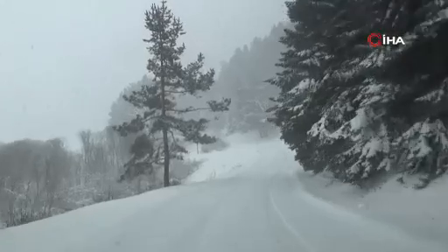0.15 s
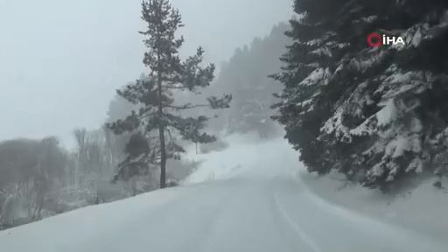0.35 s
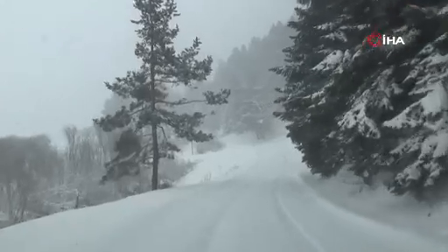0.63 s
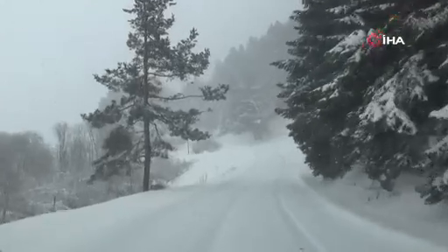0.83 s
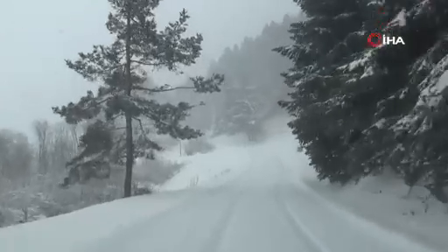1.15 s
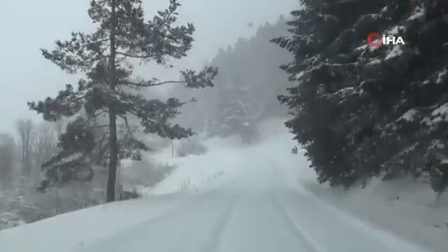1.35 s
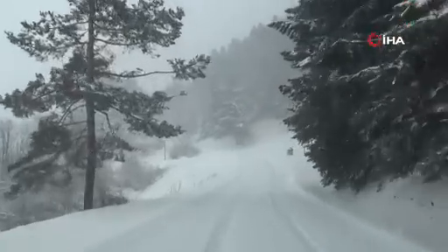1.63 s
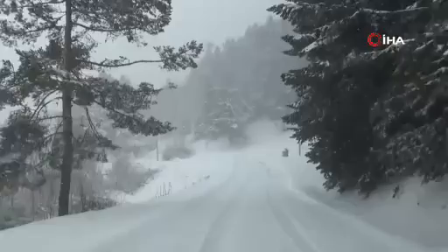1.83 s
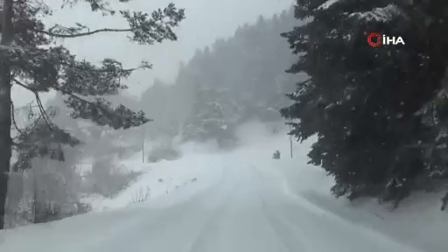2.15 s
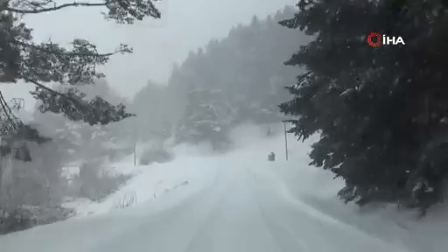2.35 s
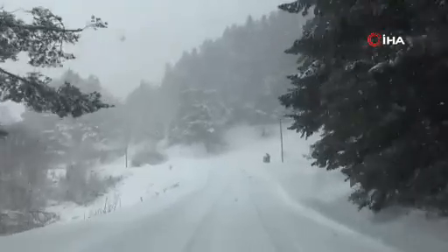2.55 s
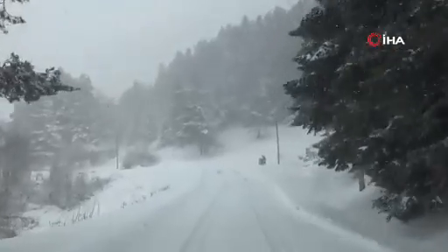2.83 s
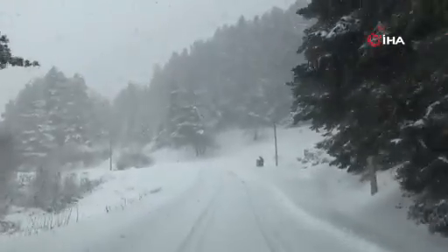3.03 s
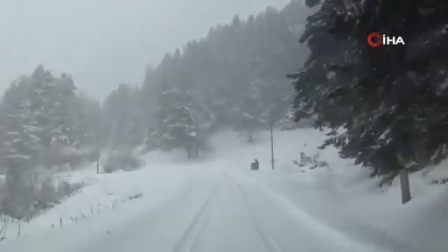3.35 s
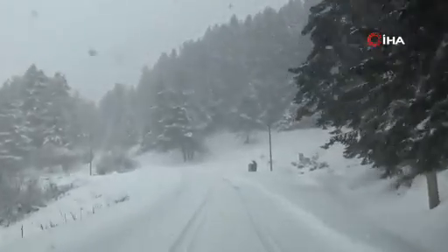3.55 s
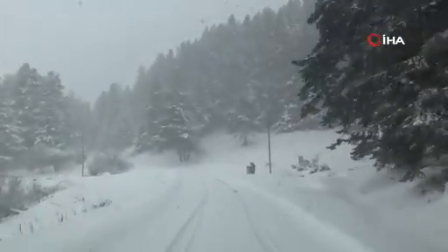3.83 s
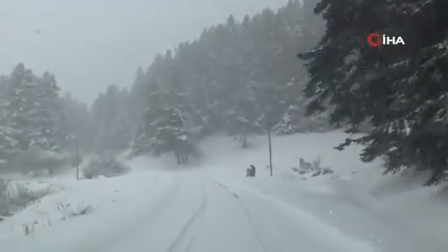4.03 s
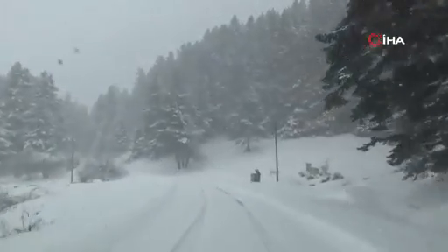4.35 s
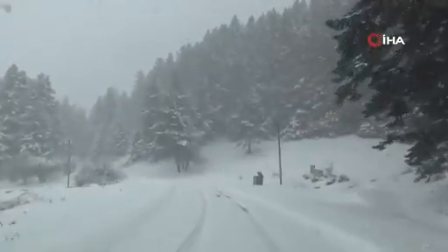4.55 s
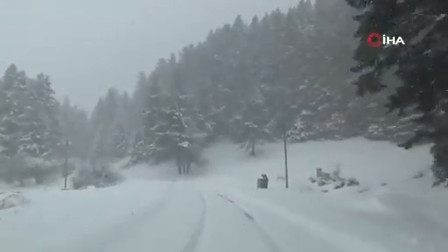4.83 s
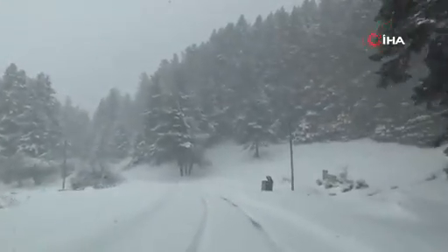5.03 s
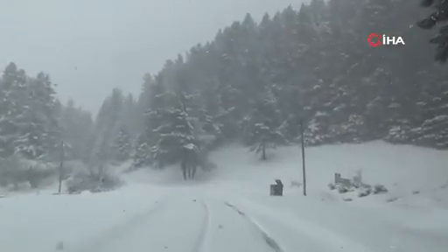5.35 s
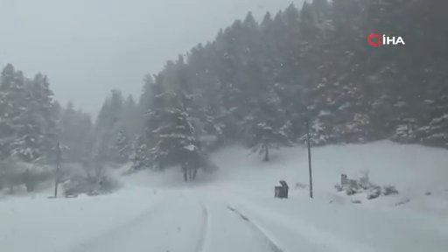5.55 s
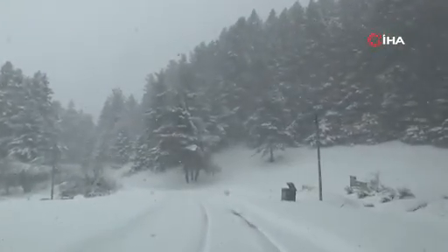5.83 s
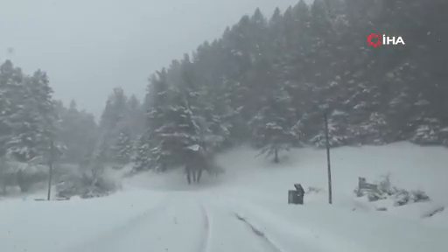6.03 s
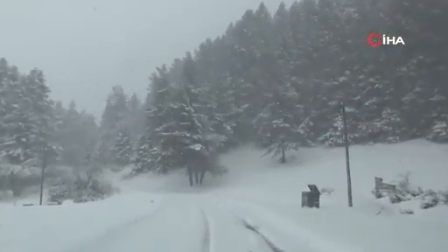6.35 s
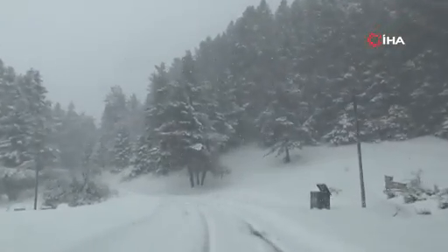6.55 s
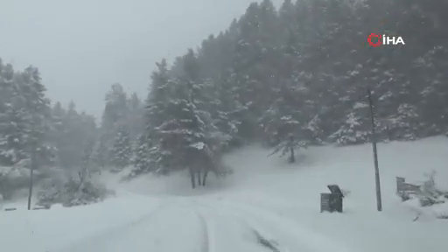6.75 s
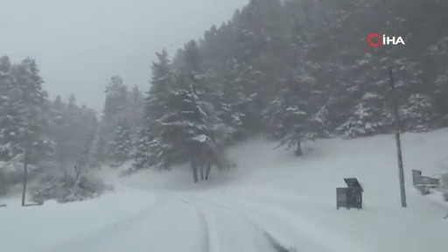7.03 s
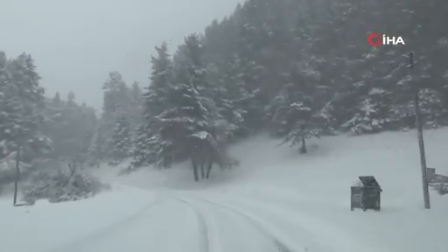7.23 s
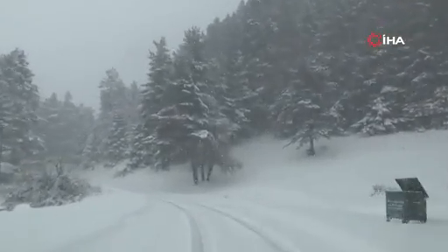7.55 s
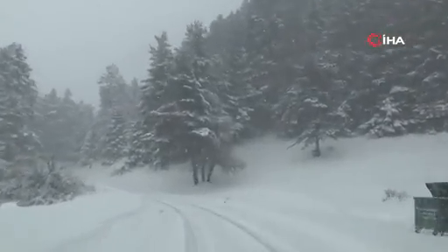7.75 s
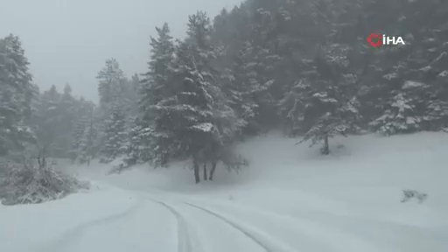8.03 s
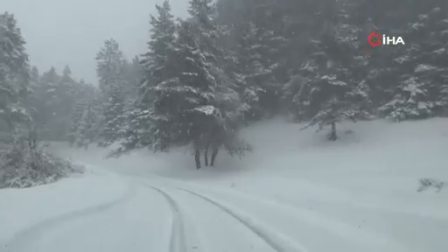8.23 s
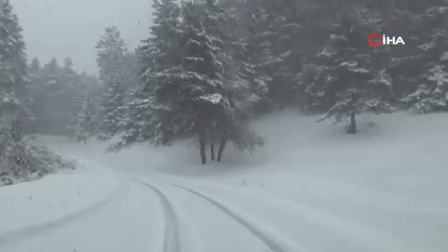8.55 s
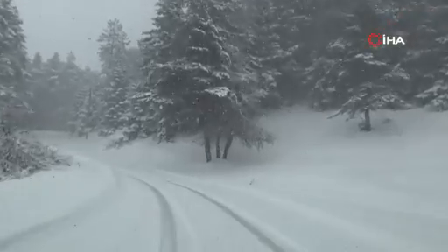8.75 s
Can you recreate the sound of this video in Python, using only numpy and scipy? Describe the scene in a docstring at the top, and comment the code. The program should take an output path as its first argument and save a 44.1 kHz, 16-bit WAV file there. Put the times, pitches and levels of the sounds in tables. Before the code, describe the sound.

A deep road rumble fills the cabin of a moving car, swelling over humps, with the engine droning faintly beneath. The microphone inside picks up small plastic ticks, short creaks and light metallic clinks over the quiet crunch of snow under the tyres. Later a faint tyre whine rises and falls amid a soft hum, and ruts thud under the floor toward the end.

```python
"""Driving on snow

Inside a car rolling steadily along a snowy road. The road shakes the body into a deep rumble over a
faint engine drone, and humps make it boom. The tyres crunch, throw snow at the wheel arches and later
hum and whine. Plastic trim ticks, something like keys clinks, panels creak and ruts thud underneath."""
import sys
import numpy as np
from scipy import signal
from scipy.fft import rfft, irfft
from scipy.io import wavfile
from scipy.ndimage import uniform_filter1d, minimum_filter1d

SR = 44100
rng = np.random.default_rng(int(sys.argv[2]) if len(sys.argv) > 2 else 0)


def unload_wav(signal):
    """Save mono or channel-first audio to the path in sys.argv[1] as 16-bit WAV at rate SR, clipped to [-1, 1]."""
    wavfile.write(
        sys.argv[1],
        SR,
        np.round(np.clip(np.atleast_2d(signal).T, -1, 1) * 32767).astype(np.int16),
    )


N = 392490
TIME = np.arange(N) / SR
FREQS = np.fft.rfftfreq(N, 1 / SR)


def gain_of(db):
    """Turns decibels into a number to multiply by."""
    return 10 ** (np.asarray(db) / 20)


def unit_rms(x):
    """Scales a signal so that its average size (rms) is 1."""
    return x / np.sqrt(np.mean(x ** 2) + 1e-20)


def across(points):
    """Reads a table of (frequency, value) at every frequency."""
    hz, value = np.transpose(points)
    return np.interp(np.log(FREQS + 1), np.log(hz + 1), value)


def along(rows):
    """Reads a table of (time, values...) at every sample."""
    s, *columns = np.transpose(rows)
    return [np.interp(TIME, s, c) for c in columns]


def add(mix, s, sound):
    """Lays a stereo sound into the mix, starting at s seconds."""
    part = mix[:, round(s * SR):][:, :sound.shape[1]]
    part += sound[:, :part.shape[1]]


def noise():
    """Two unrelated white noises."""
    return rng.standard_normal((2, N))


def wander(rate_hz):
    """A smooth random wobble of rms 1, no faster than about rate_hz."""
    return unit_rms(irfft(rfft(rng.standard_normal(N)) / (1 + (FREQS / rate_hz) ** 4), N))


def fade(t, t60):
    """Dies away by 60 dB in t60 seconds, the fade time."""
    return gain_of(-60 * t / t60)


def swell(s, length_s, db):
    """Power that rises to db at time s and falls again, staying above half for length_s."""
    distance = 2 * np.arcsinh(1) * (TIME - s) / length_s
    return gain_of(db) ** 2 / np.cosh(np.clip(distance, -20, 20)) ** 2


def steadied(x, span_s):
    """Evens out the slow chance swells of a noise."""
    power = uniform_filter1d((x ** 2).mean(0), int(span_s * SR), mode="reflect")
    return x / np.sqrt(np.abs(power) + 1e-9)


def causal(gain):
    """Makes a filter act like a real object, which rings only after it is struck."""
    log_gain = np.log(np.r_[gain, gain[-2:0:-1]])
    return np.exp(np.conj(signal.hilbert(log_gain)))[:len(gain)]


# how much louder the left side is than the right: f/Hz, level/dB
BALANCE = [(60, 0), (150, 1.5), (300, -3), (700, -1.1), (1400, -1.5), (4000, 0.3)]
# sound the two sides do not share, against what they share: f/Hz, level/dB
WIDTH = [(30, -21), (60, -20.5), (150, -9.5), (300, -5), (600, -7.5), (1300, -5), (5000, -6.5),
         (9000, -10.5), (11000, -25)]
def cabin(pair, spectrum):
    """Gives two signals a tone colour and mixes them to stereo; deep sound reaches both sides alike."""
    shared, unshared = rfft(pair)
    width, lean = gain_of(across(WIDTH)), gain_of(across(BALANCE) / 2)
    sides = np.array([(shared + width * unshared) * lean, (shared - width * unshared) / lean])
    colour = causal(unit_rms(gain_of(across(spectrum))))
    return irfft(sides * colour, N)


# how hard the road shakes the car: t/s, rumble level/dB, boom level/dB
SHAKING = [(0, -15.5, -24.5), (.85, -17, -24.5), (1.25, -17.5, -23.5), (1.7, -17.5, -25), (2.35, -15, -25),
           (2.85, -20, -24), (3.1, -13.5, -20.5), (3.85, -16.5, -24.5), (4.1, -14.5, -20.5),
           (4.9, -16.5, -25), (6.1, -14, -20.5), (6.9, -14.5, -20.5), (7.2, -19.5, -25), (7.8, -14, -19.5),
           (8.35, -16, -19.5), (8.9, -16.5, -24)]
# how loudly the tyres roar: t/s, level/dB
ROAR_LEVELS = [(.7, -31), (1.5, -29.5), (2.3, -31.5), (3.1, -31), (4.9, -32), (5.9, -30.5), (8.9, -31.5)]
# tone colours of the body's rumble, the air's boom and the tyres' roar: f/Hz, level/dB
RUMBLE_COLOUR = [(6, -40), (18, -9.5), (29, -4.5), (37, -7.5), (46, 0), (58, 0), (76, -1), (88, -3.5),
                 (100, -3), (118, -12), (170, -35), (400, -80)]
BOOM_COLOUR = [(60, -73), (105, -8.5), (125, -4.5), (147, 0.5), (170, -6), (205, -12.5), (400, -29.5),
               (900, -89)]
ROAR_COLOUR = [(90, -41.5), (190, -6.5), (280, 0), (345, -1), (400, -5.5), (540, -7.5), (615, -7),
               (770, -14.5), (890, -18), (1030, -16), (1400, -26), (2500, -50.5), (8000, -80)]
def road():
    """The uneven road shakes the body, the air in the cabin and the tyres."""
    rumble_db, boom_db = along(SHAKING)
    rumble = gain_of(rumble_db) * steadied(cabin(noise(), RUMBLE_COLOUR), span_s=0.23)
    boom = gain_of(boom_db) * steadied(cabin(noise(), BOOM_COLOUR), span_s=0.233)
    roar = gain_of(along(ROAR_LEVELS)[0]) * cabin(noise(), ROAR_COLOUR)
    return rumble + boom + roar


# the engine's tones: multiple of the firing rate, level/dB
ENGINE_TONES = [(1, -36.5), (2, -30.5), (3, -33.5), (5, -38.5)]
def engine(firing_hz=49.69, waver=0.0067, swell_db=3):
    """Steady firing makes a few low tones, each swelling and fading as the load shifts."""
    turns = np.cumsum(firing_hz * (1 + waver * wander(rate_hz=4.85))) / SR
    out = np.zeros(N)
    for multiple, db in ENGINE_TONES:
        level = gain_of(db + swell_db * wander(rate_hz=0.72))
        out += level * np.sin(2 * np.pi * (multiple * turns + rng.random()))
    return out


def grains(per_s, spread_db, t60):
    """The flickering power of many tiny bursts of random size; it averages 1."""
    loudness = np.minimum(rng.exponential(1, N), 3.2)
    hits = gain_of(spread_db * loudness) * (rng.random(N) < per_s / SR)
    t = np.arange(SR // 8) / SR
    power = signal.oaconvolve(hits ** 2, fade(t, t60) ** 2)[:N]
    return np.abs(power) / np.mean(power)


def crackle(per_s=170, spread_db=4, cycles=3.6, low_hz=1800, high_hz=8500, pitches=20):
    """Bits of snow crust snap under the tyres: tiny ticks at many pitches."""
    t, out = np.arange(SR // 50) / SR, np.zeros((2, N))
    for hz in np.geomspace(low_hz, high_hz, pitches):
        ring = np.cos(2 * np.pi * hz * t) * np.exp(-hz * t / cycles)
        for place, size, side in rng.random((int(per_s * N / SR / pitches), 3)):
            loudness = min(-np.log(1 - size), 3)
            pan = np.sqrt([[side], [1 - side]])
            add(out, place * N / SR, gain_of(spread_db * loudness) * pan * ring)
    return unit_rms(out)


# patches of loose snow: deepest at t/s, length/s, crunch level/dB
LOOSE_SNOW = [(1.4, 0.32, -52.5), (1.81, 0.056, -44.5), (2.033, 0.086, -48.5), (2.206, 0.26, -49),
              (3.656, 0.16, -47.5), (4.008, 0.087, -41), (4.26, 0.064, -44), (4.522, 0.33, -47.5),
              (6.098, 0.09, -48), (6.52, 0.17, -46), (6.897, 0.046, -41), (7.056, 0.038, -46),
              (7.822, 0.11, -46.5), (8.083, 0.06, -45), (8.3, 0.13, -42.5), (8.635, 0.14, -45.5)]
# tone colours of crushed snow and of flying snow: f/Hz, level/dB
CRUNCH_COLOUR = [(400, -40), (1100, -2.5), (1600, 1.5), (2300, 1.5), (2900, -3), (3600, -5), (4400, -7.5),
                 (7000, -25), (14000, -51)]
SPRAY_COLOUR = [(1500, -12.5), (4300, -8), (5100, -2), (5900, -2), (7000, 0), (8800, 0.5), (10000, -4.5),
                (12000, -13.5), (14500, -20.5)]
def snow(crunch_db=-48, spray_db=-52, clump_db=1.96, grain_share=0.29, thin_db=-2.5, thin_until_s=1.1):
    """Tyres crush and fling snow in clumps, more in loose patches: grains patter over a smooth hiss."""
    depth = gain_of(thin_db * np.maximum(1 - TIME / thin_until_s, 0))  # the snow starts thin
    loose = np.sqrt(sum(swell(*patch) for patch in LOOSE_SNOW))
    crunch = np.hypot(depth * gain_of(crunch_db), loose)
    spray = np.hypot(depth * gain_of(spray_db), loose * gain_of(-3))
    clumps = gain_of(clump_db * wander(rate_hz=23.4))
    lumps = grains(per_s=120, spread_db=4.2, t60=0.03)
    out = crunch * gain_of(-8) * crackle()
    for level, colour in (crunch, CRUNCH_COLOUR), (spray, SPRAY_COLOUR):
        # both layers share the big lumps, but each has its own small crystals
        crystals = grains(per_s=190, spread_db=4.6, t60=0.014)
        patter = np.sqrt(1 - grain_share + grain_share * (lumps + crystals) / 2)
        out += level * clumps * cabin(noise() * patter, colour)
    return out


# clear ticks of the plastic trim: t/s, level/dB
TRIM_TICKS = [(0.313, -39), (0.748, -37.5), (1.146, -39), (1.43, -39.5), (1.566, -37.5), (1.624, -25),
              (1.992, -35), (2.311, -32.5), (2.524, -32), (3.389, -38), (3.645, -34.5), (3.953, -31),
              (4.236, -38), (4.271, -35.5), (4.702, -39), (4.819, -38.5), (5.029, -36.5), (5.318, -34),
              (5.352, -38), (5.861, -37.5), (5.929, -31), (6.52, -41), (7.709, -31.5), (7.832, -38.5),
              (7.873, -32.5), (8.678, -35.5), (8.714, -36), (8.725, -36)]
# the notes the plastic rings with: f/Hz, level/dB
PLASTIC_NOTES = [(3620, -21), (5520, -9.5), (7050, -16.5)]
# tone colour of a tick: f/Hz, level/dB
TICK_COLOUR = [(400, -34), (1500, -18), (2900, 0), (3650, 4.5), (4400, -0.5), (5500, 0), (6200, 1.5),
               (7200, 4), (9500, -2.5), (11000, -20), (14500, -17)]
def trim(snap=4.6, rebound_s=0.0026, t60=0.042, detune=0.0264, rattles_per_s=7.4, rattle_db=-48):
    """Plastic trim snaps, bounces once and rings briefly: clear ticks among faint random rattles."""
    gaps, sizes = rng.exponential(1, (120, 2)).T
    times = np.cumsum(gaps) / rattles_per_s
    rattles = [(s, rattle_db + 2 * min(size, 2)) for s, size in zip(times, sizes) if s < N / SR]
    t, out = np.arange(SR // 8) / SR, np.zeros((2, N))
    hz, note_db = np.transpose(PLASTIC_NOTES)[:, :, None]
    hardest_db = max(db for s, db in TRIM_TICKS)
    for s, db in TRIM_TICKS + rattles:
        tick = rng.standard_normal((2, len(t))) * fade(t, t60)
        levels = gain_of(note_db + 2 * rng.standard_normal(hz.shape))
        pitches = hz * (1 + detune * rng.standard_normal(hz.shape))
        ring = (levels * np.sin(2 * np.pi * pitches * t)).sum(0) * fade(t, 1.15 * t60)
        tick[0] += gain_of((db - hardest_db) / 2) * ring  # a light tick hardly rings
        bounce = int(rebound_s * (.5 + rng.random()) * SR)
        tick[0, [0, bounce]] += snap
        add(out, s, gain_of(db) * tick)
    return cabin(out, TICK_COLOUR)


# moments when small metal pieces touch: t/s, level/dB
METAL_TOUCHES = [(0.982, -38), (2.31, -36), (3.291, -40), (3.643, -35), (3.961, -36), (4.064, -43),
                 (4.102, -43), (4.439, -40), (4.507, -37), (4.530, -27), (4.567, -37), (4.732, -32),
                 (5.029, -36), (6.427, -35)]
# the notes the metal rings with: f/Hz, level/dB, fade time/s
METAL_NOTES = [(4830, 1, 0.09), (5940, -3, 0.04), (7790, -2, 0.06), (8980, 1, 0.05), (10300, 4, .06),
               (11300, 2, 0.045)]
def clinks(scatter_db=1.0, detune=0.0044, clash_gain=0.79, clash_t60=0.049, rise_s=0.0017):
    """Small metal pieces touch: a bright clash, and notes that ring a little differently each time."""
    t, out = np.arange(SR // 3) / SR, np.zeros((2, N))
    hz, note_db, t60 = np.transpose(METAL_NOTES)[:, :, None]
    bright = signal.butter(2, [6500, 12000], "band", fs=SR, output="sos")
    octaves_down = np.maximum(np.log2(np.median(hz) / hz), 0)
    hardest_db = max(db for s, db in METAL_TOUCHES)
    for s, db in METAL_TOUCHES:
        size, shift, phase, stereo_gap = rng.standard_normal((4, len(hz), 1))
        lost_db = 3.5 * (hardest_db - db) * octaves_down  # a light touch hardly wakes the low notes
        levels = unit_rms(gain_of(note_db + scatter_db * size - lost_db))
        fading = levels * fade(t, t60) / np.sqrt(len(hz))
        angle = 2 * np.pi * (hz * (1 + detune * shift) * t + phase)
        ring = np.array([(fading * np.sin(angle + side * stereo_gap / 2)).sum(0) for side in (-1, 1)])
        clash = unit_rms(signal.sosfilt(bright, rng.standard_normal(len(t)))) * fade(t, clash_t60)
        add(out, s, gain_of(db) * (ring + clash_gain * clash) * (1 - np.exp(-t / rise_s)))
    return out


# humps in the road: crest at t/s, level/dB, boom f/Hz
ROAD_HUMPS = [(1.58, -14, 58), (1.96, -14.5, 56), (2.33, -18, 48), (2.69, -16, 50), (3.7, -19, 80),
              (4.65, -15, 72), (6.85, -17, 64), (7.66, -15, 60)]
def heaves(length_s=0.099):
    """Each hump heaves the body on its springs, so it booms for a few uneven cycles."""
    wobble, out = wander(rate_hz=14) / 2, np.zeros(N)
    for s, db, hz in ROAD_HUMPS:
        level = np.sqrt(2 * swell(s, length_s, db))
        out += level * np.sin(2 * np.pi * (hz * TIME + rng.random()) + wobble)
    return out


# panels slipping against each other: t/s, level/dB, f/Hz
PANEL_SLIPS = [(1.736, -29.5, 2040), (3.291, -31, 2000), (3.611, -28, 2000), (3.927, -32, 2050),
               (4.202, -30.5, 2420), (6.876, -31, 1960), (6.943, -32, 1960), (8.311, -31, 1750),
               (8.362, -30, 1440), (8.664, -30, 1560), (8.681, -24, 2430)]
def creaks(t60=0.026, rub_share=0.4):
    """A panel slips with a dull tap: a noisy rub and one short note."""
    t, out = np.arange(SR // 8) / SR, np.zeros((2, N))
    dull = signal.butter(2, [1100, 3000], "band", fs=SR, output="sos")
    for s, db, hz in PANEL_SLIPS:
        ring = np.sqrt(2) * np.sin(2 * np.pi * hz * t)
        rub = unit_rms(signal.sosfilt(dull, rng.standard_normal((2, len(t)))))
        creak = np.sqrt(1 - rub_share) * ring + np.sqrt(rub_share) * rub
        add(out, s, gain_of(db) * creak * fade(t, t60))
    return out


# tone colour of brushing powder snow: f/Hz, level/dB
POWDER_COLOUR = [(2500, -26), (4750, -2), (5100, 5), (5450, -4), (6600, 1), (8900, 2), (10500, -2),
                 (14500, -14)]
def swish(peak_s=2.51, length_s=0.17, db=-41):
    """Powder snow brushes along the body once: a bright, gritty hiss with a faint whistle in it."""
    grit = grains(per_s=900, spread_db=3, t60=0.008)
    return np.sqrt(swell(peak_s, length_s, db)) * cabin(noise() * np.sqrt(grit), POWDER_COLOUR)


# ruts and lumps of snow hitting the underside: t/s, level/dB, fade time/s
BLOWS = [(3.957, -23.5, 0.45), (6.908, -25.5, 0.31), (8.266, -24, 0.25), (8.549, -16, 0.13),
         (8.594, -26.5, 0.41), (8.678, -15.5, 0.045)]
# tone colour of the struck underside: f/Hz, level/dB
THUD_COLOUR = [(60, -22), (160, 8), (380, 8.5), (650, 5), (1300, -11), (2500, -26), (9000, -46)]
def thuds(rise_s=0.0003):
    """Each blow shakes a panel under the car into a dull noise that soon dies away."""
    t, out = np.arange(SR // 2) / SR, np.zeros((2, N))
    for s, db, t60 in BLOWS:
        level = gain_of(db) * fade(t, t60) * (1 - np.exp(-t / rise_s))
        add(out, s, level * rng.standard_normal((2, len(t))))
    return cabin(out, THUD_COLOUR)


# tyre hums that come and go: start t/s, end t/s, f/Hz, width/Hz, level/dB
TYRE_HUMS = [(4.951, 7.2, 612, 50, -41), (6.101, 8.898, 1030, 170, -44.5), (7.4, 9.19, 608, 95, -39)]
def hums():
    """The tread hums on packed snow: narrow bands of noise, each swelling and fading."""
    out = np.zeros((2, N))
    for start, end, hz, width, db in TYRE_HUMS:
        progress = np.clip((TIME - start) / (end - start), 0, 1)
        arch = np.sqrt(np.abs(np.sin(np.pi * progress)))
        band = irfft(rfft(noise()) / (1 + (2 * (FREQS - hz) / width) ** 2), N)
        blended = band + band[::-1] / 2  # each side also hears the other
        out += gain_of(db) * arch * steadied(blended, span_s=0.43)
    return out


# the path of the tread's whine: t/s, f/Hz, level/dB, roughness from 0 to 1
WHINE_PATH = [(4.98, 597, -48, 0.4), (5.3, 672, -43, 0.5), (5.39, 689, -40.5, 0.2), (5.72, 680, -38.5, .05),
              (5.86, 649, -45, .6), (6.17, 594, -35.5, .5), (6.4, 596, -54, 0.62)]
def whine(waver=0.0023, flutter_db=1):
    """The tread sings one note on packed snow: it climbs, holds clear, then sinks and roughens."""
    hz, db, rough = along(WHINE_PATH)
    angle = 2 * np.pi * np.cumsum(hz * (1 + waver * wander(rate_hz=17))) / SR
    grit = (wander(rate_hz=32) + 1j * wander(rate_hz=32)) / np.sqrt(2)
    jitter = np.sqrt(1 - rough) + np.sqrt(rough) * grit  # shakes both level and phase
    tone = np.sqrt(2) * (jitter * np.exp(1j * angle)).real
    sounding = (TIME > WHINE_PATH[0][0]) & (TIME < WHINE_PATH[-1][0])
    return sounding * gain_of(db + flutter_db * wander(rate_hz=6)) * tone


def scene():
    """Everything as heard behind the windscreen."""
    deep = road() + heaves() + engine() + hums() + whine() + thuds()
    bright = snow() + swish() + creaks() + clinks() + trim()
    return deep + bright


def record(dry, ceiling=0.56, hold_s=0.0056, cutoff_hz=14600):
    """A limiter turns everything down briefly at the rumble's peaks; then the highest treble is cut."""
    hold = int(hold_s * SR)
    allowed = ceiling / np.maximum(np.abs(dry).max(0), ceiling)
    limited = dry * uniform_filter1d(minimum_filter1d(allowed, hold), hold)
    lowpass = signal.firwin(401, cutoff_hz, window=("kaiser", 9), fs=SR)
    return signal.oaconvolve(limited, lowpass[None], "same")


dry = scene()
out = record(dry)
unload_wav(out)
```